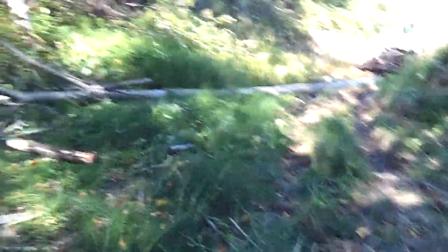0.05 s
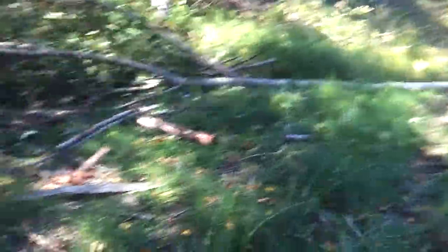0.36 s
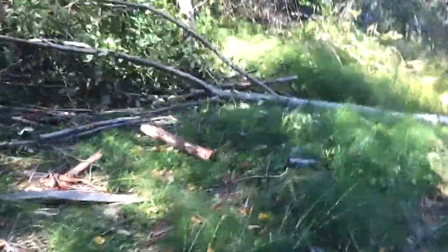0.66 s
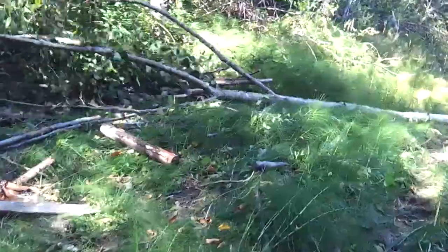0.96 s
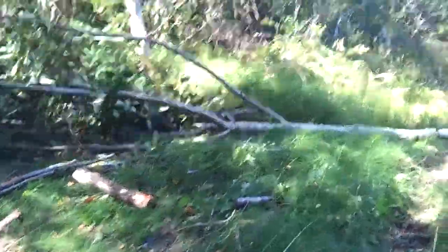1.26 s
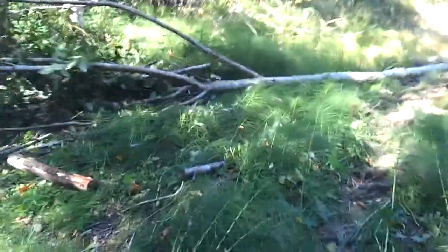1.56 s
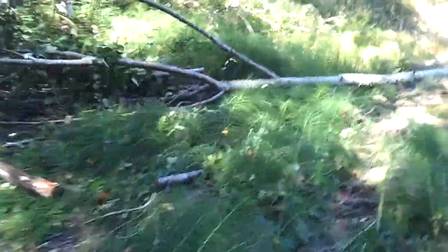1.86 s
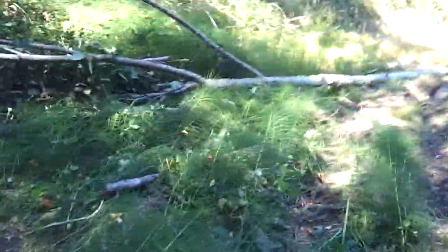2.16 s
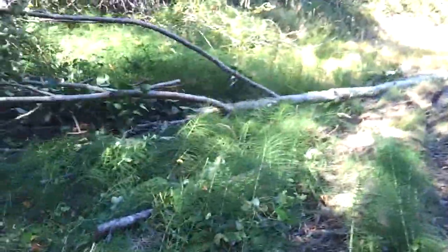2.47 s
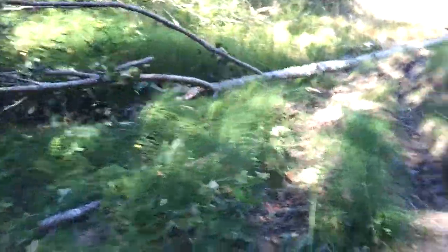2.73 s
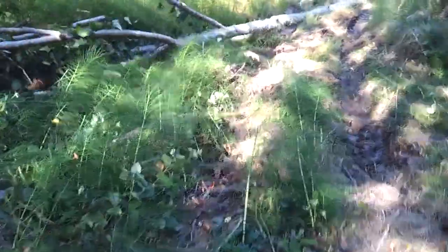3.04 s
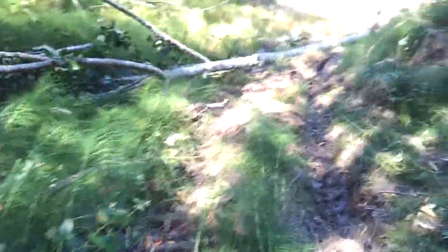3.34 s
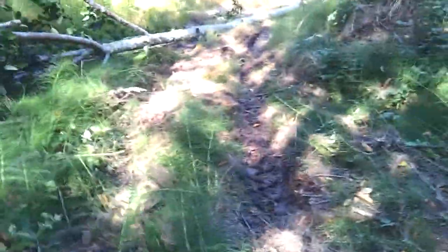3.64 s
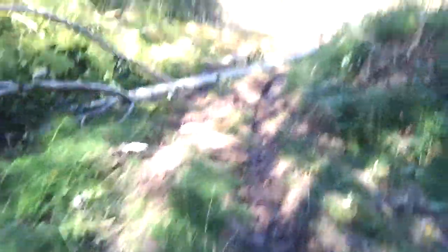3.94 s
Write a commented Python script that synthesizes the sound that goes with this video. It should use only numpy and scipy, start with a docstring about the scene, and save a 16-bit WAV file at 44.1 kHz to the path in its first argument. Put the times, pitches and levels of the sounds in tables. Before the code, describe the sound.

A felled tree drags through dry brush, opening with a thud, a volley of snapping twigs and a surge of hiss. The rustling settles and continues, with crackling stalks, scattered snaps and limbs knocking on wood and earth. Very loud cracks come near 1.8 and 3.5 seconds, each echoing briefly among the trees. A distant engine hums throughout, speeding up slightly from about 3 seconds.

```python
"""A felled tree is pulled through dry brush on a wooded slope while an engine runs some way off.
It begins with a thud, a volley of snapping twigs and a surge of hiss as the crown rubs the undergrowth.
The hiss then settles, stalks crackle, and limbs knock on wood and earth, ringing as damped modes.
Near 1.8 s and again near 3.5 s a twig breaks loudly enough to overload the microphone.
The trees answer each snap and knock with a short echo; toward the end the engine gains a little speed."""
import sys
import numpy as np
from scipy import signal
from scipy.fft import rfft, irfft
from scipy.io import wavfile
from scipy.ndimage import uniform_filter1d

SR = 44100
rng = np.random.default_rng(int(sys.argv[2]) if len(sys.argv) > 2 else 0)


def store_pcm(level_fs):
    """Save levels as 16-bit WAV."""
    pcm = np.round(np.clip(level_fs, -1, 1) * 32767).astype(np.int16)
    wavfile.write(sys.argv[1], SR, np.atleast_2d(pcm).T)


N = 176400


def amp(db):
    """Amplitude ratio of a level: a factor of ten per 20 dB."""
    return 10 ** (np.asarray(db) / 20)


def unit(x):
    """Normalisation to an rms of 1."""
    return x / np.sqrt(np.mean(x ** 2) + 1e-20)


def spectrum_at(points, hz):
    """Interpolation of a spectrum on a logarithmic frequency axis."""
    f, value = np.transpose(points)
    return np.interp(np.log(hz + 1), np.log(f + 1), value)


def curve(points, t, column=1):
    """Linear interpolation of one table column in time."""
    rows = np.array(points)
    return np.interp(t, rows[:, 0], rows[:, column])


def bell(hz, centre, octaves):
    """Gaussian band of height 1 on the octave scale."""
    return np.exp(-.5 * (np.log2((hz + 1) / centre) / octaves) ** 2)


def add(mix, start_s, sound):
    """Superposition of a sound on the mix from a given time."""
    part = mix[max(round(start_s * SR), 0):][:len(sound)]
    part += sound[:len(part)]


def colour(x, db_of, size=1024):
    """Minimum-phase filtering, with unit energy and the spectral shape db_of(frequency)."""
    log_gain = np.log(amp(db_of(abs(np.fft.fftfreq(size, 1 / SR)))))
    taps = np.fft.ifft(np.exp(np.conj(signal.hilbert(log_gain)))).real
    return signal.oaconvolve(x, taps / np.linalg.norm(taps))[:len(x)]


def white():
    """White noise: a flat spectral density of 0 dB per Hz."""
    return rng.standard_normal(N) * np.sqrt(SR / 2)


def engine():
    """Periodic firing gives a distant engine its exhaust harmonics and amplitude-modulates its rumble."""
    # engine speed (time [s], firing rate [Hz])
    firing = [(0.0, 37.05), (2.92, 37.9), (4.0, 39.96)]
    # exhaust tones (multiple of the firing rate [1], level [dB])
    exhaust = [(2, -53), (3, -48), (4, -54.5), (5, -45), (6, -51.5)]
    # rumble spectrum (frequency [Hz], density [dB per Hz])
    rumble_spectrum = [(20, -90), (40, -78.5), (62, -70), (110, -67.5), (170, -66), (250, -63), (370, -69),
                       (600, -76), (3000, -115)]
    phase = 2 * np.pi * np.cumsum(curve(firing, np.arange(N) / SR)) / SR
    tones = sum(np.sqrt(2) * amp(db) * np.cos(k * phase + 2 * np.pi * rng.random()) for k, db in exhaust)
    cycle = phase / 3  # three cylinders, pulsing unevenly
    throb = unit(1 + 0.43 * np.cos(phase) + 0.29 * np.cos(2 * cycle))
    rumble_gain = amp(spectrum_at(rumble_spectrum, np.fft.rfftfreq(N, 1 / SR)))
    return tones + irfft(rfft(white() * throb) * rumble_gain, N)


def woods_echo(x, build_s=0.016):
    """Multiple scattering from trunks and foliage: a diffuse echo builds up and decays exponentially."""
    # reverberation of the woods (frequency [Hz], time to fall 60 dB [s])
    t60 = [(200, 0.32), (1500, 0.42), (5500, 1), (9000, 0.75), (14000, 0.16)]
    hz, t, spectra = signal.stft(rng.standard_normal(SR), SR, nperseg=256)
    decay = amp(-60 * t / spectrum_at(t60, hz)[:, None])
    tail = signal.istft(spectra * decay * np.minimum(t / build_s, 1), SR, nperseg=256)[1]
    return signal.oaconvolve(x, tail / np.linalg.norm(tail))[:N]


def ground_reflection(x):
    """Destructive interference: the slope's reflection cancels a band that shifts as the listener moves."""
    # interference notch (time [s], frequency [Hz], gain at its centre [dB])
    notch = [(0, 500, -7), (.55, 560, -19), (1.4, 550, -19), (1.75, 440, -12), (2.2, 510, -18),
             (2.6, 620, -10), (2.93, 635, -24), (3.3, 680, -14), (3.7, 480, -3)]
    hz, t, spectra = signal.stft(x, SR, nperseg=2048, noverlap=1536)
    wander = unit(uniform_filter1d(rng.standard_normal(len(t)), size=6))
    octaves = .15 * 1.5 ** np.clip(wander, -2, 2)  # the notch widens and narrows
    gain = amp(curve(notch, t, column=2) * bell(hz[:, None], curve(notch, t), octaves))
    return signal.istft(spectra * gain, SR, nperseg=2048, noverlap=1536)[1][:N]


def brush_hiss(patch_db=0.93, flicker_db=0.8):
    """Friction noise of the crown on leaves and grass: a patchy hiss that swells as boughs sweep through."""
    # base spectrum of the hiss (frequency [Hz], density [dB per Hz])
    hiss = [(100, -92), (300, -74), (520, -66.5), (800, -67.5), (1100, -67.5), (1500, -65), (1950, -62),
            (2450, -65), (3000, -70), (3600, -66.5), (4400, -60.5), (5300, -58.5), (6800, -62),
            (8300, -63.5), (9700, -73.5), (11000, -70.5), (12700, -75), (14500, -74)]
    # how hard the crown drags (time [s], midrange gain [dB], treble gain [dB])
    drag = [(0, 6.5, 8.5), (.08, 4, 5), (.16, -2, -2.5), (.45, -1.5, -0.5), (.95, 0, 1), (1.2, -2, -0.5),
            (1.6, 0, 1.5), (1.87, 1.5, 1), (2.13, -0.5, -0.5), (2.4, -0.5, 1), (2.85, 2, 2), (3.13, 2, 1),
            (3.52, 3, 3.5), (4, 1.5, 1)]
    # boughs sweeping through leaves (time [s], half length [s], treble gain [dB])
    swishes = [(0.663, 0.016, 6.5), (1.835, 0.032, 5), (2.438, 0.02, 5), (3.431, 0.01, 6.5)]
    hz, t, spectra = signal.stft(white(), SR, nperseg=1024, noverlap=768)
    hz = hz[:, None]
    treble = np.clip(np.log2((hz + 1) / 2300), 0, 1)  # crossfade over the octave above 2300 Hz
    swish_db = sum(db * np.exp(-((t - s) / length) ** 2) for s, length, db in swishes)
    midrange_db = curve(drag, t) + swish_db / 2
    treble_db = curve(drag, t, column=2) + swish_db
    patches = uniform_filter1d(rng.standard_normal(spectra.shape), size=10, axis=0)
    patches = unit(uniform_filter1d(patches, size=8, axis=1))
    db = spectrum_at(hiss, hz) + (1 - treble) * midrange_db + treble * treble_db
    db += patch_db * patches + flicker_db * rng.standard_normal(len(t))
    return signal.istft(spectra * amp(db), SR, nperseg=1024, noverlap=768)[1][:N]


def twig_spectrum(ring_hz, body_db, top_db):
    """Resonance colours a fracture: a narrow ring, a broad woody body and a shelf in the top treble."""
    # spectrum common to all breaking twigs (frequency [Hz], relative level [dB])
    crack = [(90, -54), (420, -17), (750, -16.5), (2000, -8), (3200, -10.5), (4300, -2.5), (5300, 2),
             (8200, -2.5), (9800, -14), (11200, -13.5), (12500, -17), (14500, -18.5)]
    return lambda f: (spectrum_at(crack, f)
                      + 6.5 * bell(f, ring_hz, octaves=0.064)
                      + body_db * bell(f, 1560, octaves=0.84)
                      + top_db / (1 + (9040 / (f + 1)) ** 10))


def stalk_crackle(per_s=110, spread_db=3.6, decay_s=0.0027, kinds=12, size=600):
    """A Poisson process of tiny fractures: stalks and dry leaves break at random under the crown."""
    strength = amp(spread_db * np.minimum(rng.exponential(1, N), 3))
    impulses = strength * (rng.random(N) < per_s / SR)
    kind, crackle = rng.integers(0, kinds, N), np.zeros(N)
    for k, ring_hz in enumerate(np.geomspace(4300, 9000, kinds)):
        burst = rng.standard_normal(size) * np.exp(-np.arange(size) / SR / decay_s)
        tick = colour(burst, twig_spectrum(ring_hz, body_db=-2.3, top_db=5))
        crackle += signal.oaconvolve(impulses * (kind == k), tick)[:N]
    return amp(-27) * crackle


def limb_knocks(rise_cycles=0.72, size=10000):
    """Impact excitation: each blow rings one damped mode of a limb and rattles the bark around it."""
    # blows on wood and earth (time [s], level [dB], frequency [Hz], decay [s], relative rattle [dB])
    knocks = [(0, -13.5, 255, 0.011, -20), (.249, -19, 830, 0.0028, 5), (.359, -11, 2030, 0.004, -14),
              (1.011, -20, 1180, 0.008, 1), (1.011, -19, 1710, 0.0088, -11), (1.181, -17, 181, 0.01, -11),
              (1.215, -26.5, 85, 0.025, -5), (1.235, -24, 1260, .003, -5), (1.7761, 6, 1580, 0.0014, -1),
              (1.910, -19, 1022, 0.0068, -5), (2.743, -12.5, 1430, 0.008, -6),
              (2.798, -13, 2320, 0.0067, -7), (3.015, -23.5, 187, 0.01, -4), (3.025, -28.5, 85, 0.038, -25),
              (3.479, -8, 1557, .003, -3), (3.511, -23.5, 320, .015, -11), (3.575, -13.5, 634, 0.02, -3)]
    t, mix = np.arange(size) / SR, np.zeros(N)
    for start_s, level_db, hz, decay_s, rattle_db in knocks:
        envelope = np.minimum(t * hz / rise_cycles, 1) * np.exp(-t / decay_s)
        mode = envelope * np.sin(2 * np.pi * hz * t)
        noise = envelope * rng.standard_normal(size)
        rattle = colour(noise, lambda f: 35 * bell(f, 1.37 * hz, octaves=2.38))
        add(mix, start_s, amp(level_db) * (mode + amp(rattle_db) * rattle))
    return mix


def twig_snaps(rise_s=0.00013, fibre_s=.0005, fibre_db=3.2, size=6000):
    """Brittle fracture: fibres give way one after another in a ragged burst that nearby stems scatter."""
    # breaking twigs (time [s], level [dB], decay [s], ring [Hz], woody body [dB], top treble [dB])
    snaps = [(0.018, -4, 0.0015, 5600, -1, -4), (0.0211, 1.5, 0.0011, 5000, 3, 2),
             (0.0244, 2.5, 0.0024, 6160, 2, -4), (0.0455, -7, 0.0035, 6000, 0, -7),
             (0.056, -4, 0.0022, 6000, -3, -5), (0.0717, -7, 0.0018, 8250, 3, 1),
             (0.076, -8.5, 0.003, 8400, -3, 3), (0.1132, -9.5, 0.0018, 5570, -9, -8),
             (0.359, -16.5, 0.0039, 8000, 18, 12), (.445, -18, 0.0016, 5500, -11, 16),
             (0.5441, -0.5, 0.0039, 4800, -5, 14), (0.848, 1.5, 0.0016, 5440, 2.5, 12.5),
             (0.916, -13, .002, 6000, -1, 14), (0.9362, -4, 0.0018, 5660, -11, 10),
             (1.114, -0.5, 0.0014, 5400, -20, 4), (1.235, -5.5, 0.0022, 5900, -0.5, -1),
             (1.3506, -11, 0.0026, 5600, -11, 9), (1.488, -6.5, 0.005, 5400, 7.5, -1),
             (1.5043, -10, 0.0036, 5450, 6, 8), (1.549, 0.5, 0.0039, 5430, -6, 8),
             (1.7763, 7.5, 0.0072, 5450, 4, 0), (2.2189, -5, .0015, 7150, -3, 0),
             (2.222, -6, 0.0055, 7400, -25, 6), (2.435, -19, 0.005, 5800, -6, -5),
             (2.5407, -11, 0.0028, 5500, -4, 2), (2.577, -13, 0.0059, 5530, 8, 13),
             (2.6024, -4, 0.0054, 4900, -4, 3), (2.7417, -4.5, 0.0063, 4400, 5.5, -11),
             (2.7978, -2.5, 0.0065, 6250, -1.5, 0), (3.272, -7.5, 0.0026, 5480, -13, 7),
             (3.355, -12, 0.0046, 6100, -10, 9), (3.4776, 5, 0.0073, 6900, 0.5, -1.5),
             (3.5325, -10, 0.0078, 4760, 1, -1), (3.585, -9, 0.0059, 5170, 5, 0),
             (3.620, -5, 0.0011, 4420, 7, 11), (3.776, -11.5, 0.0028, 4900, 3, 6),
             (3.982, -14, .002, 5400, 5, -6)]
    t, mix = np.arange(size) / SR, np.zeros(N)
    scatter = amp(-17) * np.exp(-t / .012)
    for start_s, level_db, decay_s, ring_hz, body_db, top_db in snaps:
        noise, fibres = rng.standard_normal((2, size))
        ragged = amp(fibre_db * np.interp(t / fibre_s, np.arange(size), np.clip(fibres, -2, 2)))
        envelope = np.minimum(t / rise_s, 1) * (np.exp(-t / decay_s) + scatter)
        burst = colour(noise * ragged * envelope, twig_spectrum(ring_hz, body_db, top_db))
        burst *= np.linalg.norm(envelope) / np.linalg.norm(burst)
        add(mix, start_s, amp(level_db) * burst)
    return mix


def scene():
    """Mid-side stereo: the scene is nearly mono; the side channel holds only a faint quadrature copy of the
    snaps and knocks and a far fainter, independent hiss and engine."""
    wood = twig_snaps() + limb_knocks()
    background = amp(-16) * woods_echo(wood) + stalk_crackle() + brush_hiss() + engine()
    mid = wood + ground_reflection(background)
    side = amp(-58) * (brush_hiss() + engine()) + amp(-32) * signal.hilbert(wood).imag
    return np.array([mid + side, mid - side])


def record(dry):
    """Overload and band limiting: the loudest snaps clip, then a low-pass removes the highest treble."""
    clip_level, cutoff_hz = .92, 14650
    low_pass = signal.firwin(401, cutoff_hz, window=("kaiser", 8), fs=SR)
    return signal.oaconvolve(np.clip(dry, -clip_level, clip_level), low_pass[None], "same")


dry = scene()
out = record(dry)
store_pcm(out)
```